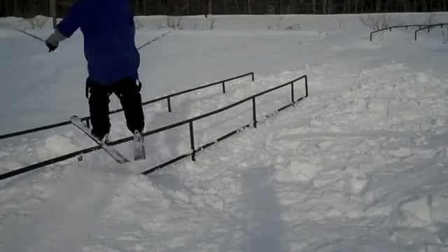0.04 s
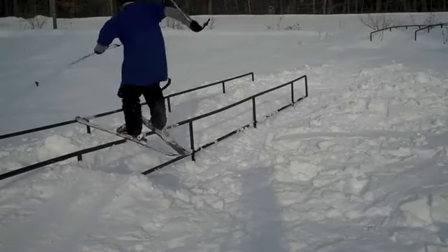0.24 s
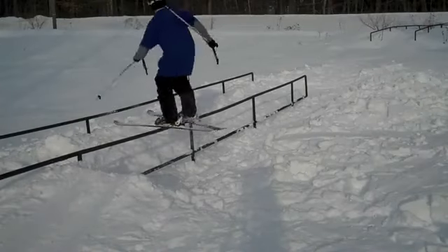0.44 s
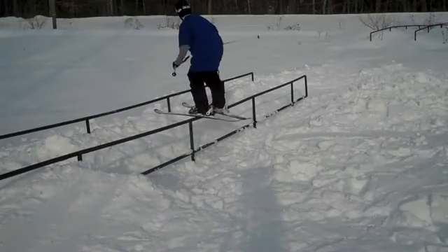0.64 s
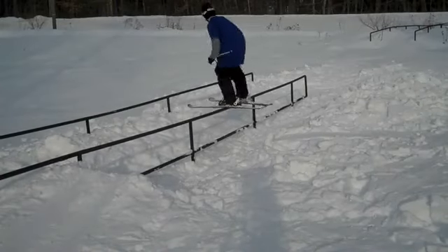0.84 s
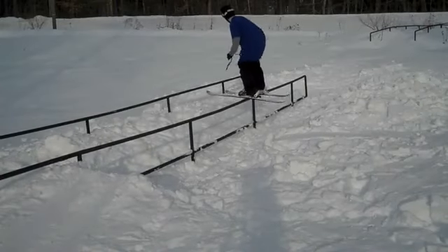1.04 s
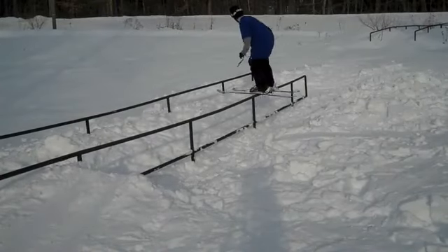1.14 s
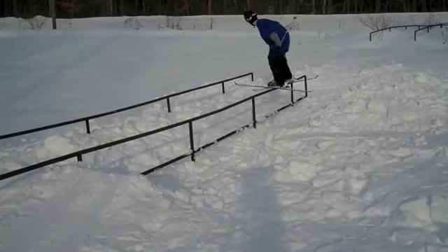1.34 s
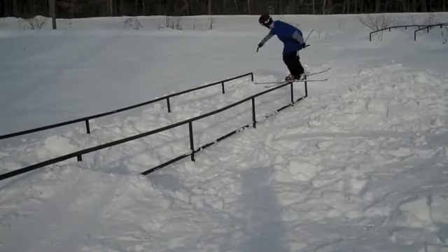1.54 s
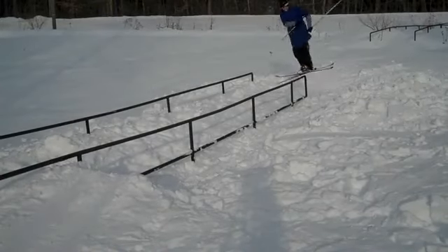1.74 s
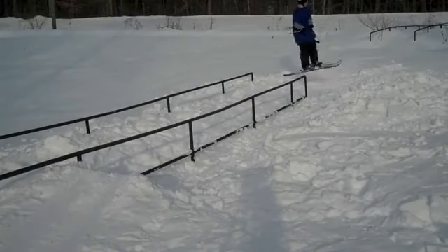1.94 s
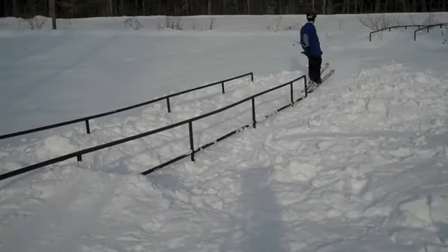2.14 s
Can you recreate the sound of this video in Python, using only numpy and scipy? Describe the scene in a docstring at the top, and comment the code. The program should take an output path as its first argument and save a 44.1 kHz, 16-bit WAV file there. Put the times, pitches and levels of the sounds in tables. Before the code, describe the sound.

Skis hit a metal rail with two sharp clacks, then grind and hiss along it with scattered knocks. They clatter off the end and crunch into snow. Outdoors there is no echo, and faint wind touches the microphone.

```python
"""Skis land on a steel handrail with two sharp clacks, slide along it sideways and clatter off the end.
Each impact is a short force pulse that excites ski, steel edge and binding; friction, thousands of
tiny catches a second, makes the edges grind and hiss. Both drive the tube's faintly ringing modes.
Snow sprays at the take-off ramp and crunches after the rail. Open snow gives almost no echo;
light wind touches the two small microphones."""
import sys
import numpy as np
from scipy import signal
from scipy.fft import rfft, irfft
from scipy.io import wavfile
from scipy.ndimage import uniform_filter1d

SR = 44100
rng = np.random.default_rng(int(sys.argv[2]) if len(sys.argv) > 2 else 0)


def inscribe(sig):
    """Save sig as 16-bit PCM at rate SR to the path in sys.argv[1].

    A 1-D sig is mono; a 2-D sig holds one channel per row.
    Samples are clipped to [-1, 1] before scaling.
    """
    pcm = np.round(np.clip(np.atleast_2d(sig).T, -1, 1) * 32767)
    wavfile.write(sys.argv[1], SR, pcm.astype(np.int16))


N = 97020
T = np.arange(N) / SR


def amp(db):
    """Amplitude ratio of a level in decibels."""
    return 10 ** (np.asarray(db) / 20)


def unit_rms(x):
    """Normalisation to mean power 1."""
    return x / np.sqrt(np.mean(x ** 2) + 1e-20)


def unit_energy(x):
    """Normalisation of each channel to energy 1."""
    return x / np.sqrt(np.sum(x ** 2, axis=-1, keepdims=True) + 1e-20)


def add(mix, start_s, sound):
    """Superposition: a sound joins the mix at its start time."""
    part = mix[..., max(round(start_s * SR), 0):][..., :sound.shape[-1]]
    part += sound[..., :part.shape[-1]]


def convolve(x, response):
    """Convolution with an impulse response, cut to the length of x."""
    return signal.fftconvolve(np.atleast_2d(x), np.atleast_2d(response), axes=1)[:, :x.shape[-1]]


def colour(x, points, size=4096):
    """Minimum-phase filter through points of (f/Hz, level/dB)."""
    hz, db = np.transpose(points)
    bin_hz = abs(np.fft.fftfreq(size, 1 / SR))
    log_gain = np.log(amp(np.interp(np.log(bin_hz + 1), np.log(hz + 1), db)))
    spectrum = np.exp(np.conj(signal.hilbert(log_gain)))
    return convolve(x, np.fft.ifft(spectrum).real[:size // 2])


def resonate(x, hz, width_hz):
    """Damped resonator whose natural frequency follows a curve."""
    turn = np.exp(2j * np.pi * np.cumsum(hz) / SR)
    pole = np.exp(-np.pi * width_hz / SR)
    return 2 * (turn * signal.lfilter([1 - pole], [1, -pole], x / turn)).real


def emphasise(x, hz, width_hz, db):
    """Resonance lifts one band out of a sound; the sum has energy 1."""
    return unit_energy(x + amp(db) * resonate(x, np.full(x.shape[-1], hz), width_hz))


def wobble(corner_hz):
    """Random fluctuation: low-pass noise of rms 1."""
    hz = np.fft.rfftfreq(N, 1 / SR)
    return unit_rms(irfft(rfft(rng.standard_normal(N)) / (1 + (hz / corner_hz) ** 2), N))


def grains(per_s, spread_db, apart):
    """Shot noise: random impulses common to both channels, plus each one's own, weighted by `apart`."""
    size = amp(spread_db * np.minimum(rng.exponential(1, (3, N)), 4))
    clicks = size * rng.choice([-1, 1], (3, N)) * (rng.random((3, N)) < per_s / SR)
    return clicks[0] + apart * clicks[1:]


def air_and_wind():
    """Turbulence at the microphones rumbles in puffs over the ambient noise of quiet winter air."""
    # spectra of air and wind: f/Hz, relative level/dB
    air_spectrum = [(30, 5.5), (150, 0.5), (400, 7), (800, 5.5), (1800, -6), (3500, -9), (7000, -16),
                    (14000, -6)]
    wind_spectrum = [(10, 6), (45, -1), (120, 0.5), (200, -8), (400, -44), (2000, -72)]
    # puffs of wind: t/s, level/dB, length/s
    puffs = [(0.095, -40, 0.022), (0.143, -51.5, 0.04), (0.354, -48, 0.036), (.5, -51.5, 0.039),
             (0.74, -49.5, 0.05), (1.332, -57, 0.044), (1.878, -57, 0.13)]
    noise = rng.standard_normal((6, N))
    air = unit_rms(colour(noise[0] + 0.73 * noise[1:3], air_spectrum))
    wind = unit_rms(colour(noise[3] + 4.1 * noise[4:], wind_spectrum))
    gusts = amp(-64) + sum(amp(db) * np.exp(-(2 * (T - s) / length) ** 2) for s, db, length in puffs)
    return amp(-53.5) * air + gusts * wind * amp([[-2], [2]])  # stronger on the right


def snow():
    """Granular noise: thrown snow sprays and pressed snow crunches, in exponentially decaying bursts."""
    # bursts of snow: t/s, spray level/dB, crunch level/dB, time constant/s
    bursts = [(0.011, -42, -69, 0.029), (1.85, -62, -55.5, 0.21), (2.039, -64, -56.5, 0.03)]
    # spectra of spray and crunch: f/Hz, relative level/dB
    spray_spectrum = [(1000, -7), (4000, -4.5), (6000, -1), (8000, 3.5), (10000, -1), (15000, 3)]
    crunch_spectrum = [(200, -14), (600, -1), (1500, 6.5), (2500, -0.5), (4000, -8), (7000, -14),
                       (12000, -12)]
    spray, crunch = (unit_rms(colour(grains(per_s=5000, spread_db=4.5, apart=.7), spectrum))
                     for spectrum in (spray_spectrum, crunch_spectrum))
    out = np.zeros((2, N))
    for s, spray_db, crunch_db, decay_s in bursts:
        envelope = (T > s) * np.exp(-abs(T - s) / decay_s)
        out += envelope * (amp(spray_db) * spray + amp(crunch_db) * crunch)
    return out


def rail_modes():
    """The steel tube's impulse response is a sum of damped normal modes."""
    # modes of the tube: f/Hz, relative level/dB, T60/s
    modes = [(210, -26, .45), (371, -23, .45), (690, -14, .35), (824, -14, .35), (1082, -12, .25),
             (1443, -7, .2), (1497, -1, .28), (1620, -1, .3), (1728, -7, .2), (1846, 1, .22),
             (2196, -4, .3), (2336, -8, .3), (2470, -7, .3), (2830, -9, .3)]
    t = T[:SR]
    ring = sum(amp(db) * unit_energy(amp(-60 * t / t60) * np.sin(2 * np.pi * (hz * t + rng.random())))
               for hz, db, t60 in modes)
    return unit_energy(ring)


def rail(force):
    """Forced vibration: the tube responds most on its last span and little at the end post."""
    # mobility of the tube under the moving skis: t/s, relative level/dB
    mobility = [(.4, -1.5), (1.3, 0.5), (1.52, 0.5), (1.68, 2.5), (1.8, -4)]
    gain = amp(np.interp(T, *np.transpose(mobility)))
    ring = unit_rms(convolve(force.mean(0), rail_modes()))
    return gain * ring * np.sqrt(np.mean(force ** 2))


def dense_ring(t60):
    """Overlapping modes of ski and binding ring as decaying noise, a little different in each channel."""
    t = T[:SR // 2]
    noise = rng.standard_normal((3, len(t)))
    return unit_energy((noise[0] + 0.19 * noise[1:]) * amp(-60 * t / t60))


def landings():
    """Sudden loading: the skier's weight gives a rough shudder and sets the tube's low modes humming."""
    # each ski's push on the tube: t/s, level/dB
    pushes = [(0.221, -50.5), (.338, -52)]
    # spectrum of a push: f/Hz, relative level/dB
    push_spectrum = [(100, -5), (210, -0.5), (370, 0), (700, -11), (1500, -30), (3000, -20)]
    out = np.zeros((2, N))
    for s, db in pushes:
        shudder = unit_energy(colour(dense_ring(t60=0.44), push_spectrum))
        hum = unit_energy(colour(rail_modes(), push_spectrum))
        add(out, s, amp(db) * shudder)
        add(out, s, amp(db + 2.5) * hum)
    return out * np.sqrt(SR / 10)  # levels refer to the energy spread over 0.1 s


def shimmer(x, patch_hz=170, patch_s=.05, depth_db=2.8, size=512):
    """Spectral modulation: narrow resonances come and go as the edges press on new spots of steel."""
    hop = size // 4
    spectra = signal.stft(x, nperseg=size, noverlap=size - hop)[2]
    patches = rng.standard_normal(spectra.shape[1:])
    patches = uniform_filter1d(patches, max(1, round(patch_hz * size / SR)), axis=0)
    patches = uniform_filter1d(patches, max(1, round(patch_s * SR / hop)), axis=1)
    gain = unit_rms(amp(depth_db * unit_rms(patches)))
    return signal.istft(spectra * gain, nperseg=size, noverlap=size - hop)[1][:, :N]


def slide():
    """Stick-slip friction: the chattering edges catch on the steel, grind, hiss and drive the tube."""
    # course of the slide: t/s, grinding level/dB, hiss level/dB
    course = [(.33, -65, -44), (.35, -48, -63), (.395, -38.5, -41), (.44, -42, -41), (0.577, -36, -36),
              (.61, -41, -41), (.678, -35, -38.5), (0.731, -45.5, -45.5), (0.783, -31.5, -35),
              (0.814, -43, -37), (0.871, -33, -35.5), (.92, -39.5, -41), (.99, -36.5, -43),
              (1.13, -30.5, -36.5), (1.21, -30.5, -36), (1.29, -28, -35.5), (1.405, -27, -38),
              (1.444, -23, -36), (1.478, -32, -43.5), (1.55, -26, -38), (1.6, -32, -42), (1.69, -33, -40.5),
              (1.753, -32, -36), (1.797, -38, -56), (1.817, -93, -49)]
    # spectra of grinding and edge hiss: f/Hz, relative level/dB
    grind_spectrum = [(60, -58), (250, -22), (480, -14.5), (750, -1.5), (1050, 2), (1700, 4.5), (2400, -2),
                      (3200, -14.5), (4500, -22), (10000, -76.5)]
    hiss_spectrum = [(600, -52), (1800, -3.5), (2900, 11), (4000, 2.5), (5400, 4.5), (7500, -1),
                     (10000, -6), (15000, -3.5)]
    # ski resonance, shifting with the contact point: t/s, f/Hz, level/dB re the broadband grinding
    ski_resonance = [(.35, 2080, 3), (.57, 1960, -5.5), (.88, 1290, 3), (1.05, 2050, -4.5), (1.2, 2300, 2),
                     (1.36, 1890, -10.5), (1.45, 1740, 0), (1.55, 1490, -3), (1.6, 1550, 4.5),
                     (1.625, 2190, -2), (1.65, 2740, -5.5), (1.75, 2460, -3.5), (1.8, 2300, -0.5)]
    s, grind_db, hiss_db = np.transpose(course)
    grind_gain, hiss_gain = (amp(np.interp(T, s, db, -np.inf, -np.inf)) for db in (grind_db, hiss_db))
    chatter = wobble(corner_hz=106)
    grind_chatter, hiss_chatter = amp(1.45 * chatter), amp(1.5 * chatter)
    catches, tone = (grains(per_s=5000, spread_db=2, apart=.14) * grind_chatter for _ in range(2))
    tone_s, tone_hz, tone_db = np.transpose(ski_resonance)
    for _ in range(2):  # two passes steepen the resonance's flanks
        tone = resonate(tone, np.interp(T, tone_s, tone_hz), width_hz=750)
    tone = unit_rms(tone) * amp(np.interp(T, tone_s, tone_db))
    grind = unit_rms(unit_rms(colour(catches, grind_spectrum)) + tone)
    fine_catches = grains(per_s=14000, spread_db=3.0, apart=.95) * hiss_chatter
    hiss = unit_rms(colour(fine_catches, hiss_spectrum))
    ring = rail(unit_rms(catches) * grind_gain)
    return grind_gain * grind + hiss_gain * hiss + amp(-9) * ring


def noise_pulse(decay_s):
    """A brief pulse is broadband: a rough burst, whitened to an even spectrum."""
    t = T[:SR // 3]
    burst = rng.standard_normal(len(t)) * np.exp(-t / decay_s) * (1 - np.exp(-2 * t / decay_s))
    power = uniform_filter1d(abs(rfft(burst)) ** 2, size=260)
    whitening = np.transpose([np.fft.rfftfreq(len(t), 1 / SR), -10 * np.log10(power)])
    return unit_energy(colour(burst, whitening)[0])


def clacks():
    """Impact excitation: ski and edge ring at pitches set by the spot struck; binding and tube follow.
    The burst at 0.2105 s is a faint, short swell of noise just before the first clack."""
    # short bursts: t/s, thud level/dB, knock level/dB, crack level/dB, time constant/s,
    # rattle level offset/dB, ping f/Hz, crack f/Hz
    bursts = [(0.0708, -73, -53, -54.5, 0.0026, -18, 2800, 5000),
              (0.2105, -41, -32.5, -34, 0.0034, -8, 1890, 6000),
              (0.2180, -24, -17, -15, 0.00065, -1.5, 2300, 5350),
              (.2203, -29.5, -29, -41, 0.0012, 6.5, 2770, 6200),
              (0.2411, -31.5, -22, -23, 0.00045, -5, 1590, 7700),
              (0.327, -64, -29.5, -30.5, 0.0029, -9, 2080, 6350),
              (0.3363, -23.5, -16, -16.5, 0.0005, -2, 2245, 7250),
              (0.3394, -28.5, -23, -24.5, 0.0013, 1.5, 1750, 5950),
              (.3755, -43, -32, -40.5, 0.0012, -16, 1986, 7400),
              (.570, -40, -30, -46, 0.0064, 11.5, 1840, 5700),
              (.764, -32, -33, -29, 0.0022, 5.5, 2800, 6200),
              (0.784, -22.5, -22.5, -22.5, 0.0013, 0.5, 1870, 6260),
              (0.7884, -24, -25, -28.5, 0.0029, -10, 2740, 6740),
              (.8675, -44, -27, -27, 0.0041, 1, 3000, 6060),
              (0.8837, -30, -38, -27.5, 0.0015, 4.5, 1470, 5700),
              (1.1115, -31.5, -24.5, -36, 0.00084, 1, 1660, 6100),
              (1.3818, -52, -23.5, -33, 0.0024, 7, 1850, 4500),
              (1.4438, -29, -22, -43, 0.0018, -10, 1730, 7000),
              (1.4607, -30, -17.5, -37, 0.0013, 0, 1520, 7000),
              (1.5445, -42, -31, -32.5, 0.0036, -6, 1640, 6800),
              (1.558, -40, -24, -52, 0.0015, -6, 1630, 7050),
              (1.753, -33.5, -30.5, -37, 0.001, 1, 1580, 7400),
              (1.8176, -35, -28, -30.5, 0.0009, -10.5, 2290, 7700),
              (1.828, -28.5, -32.5, -46, 0.0036, -20, 1760, 7000),
              (1.9368, -36.5, -36.5, -35.5, 0.0021, 1, 2220, 6550),
              (1.9412, -33.5, -26, -27.5, 0.00079, -8, 2160, 4800),
              (1.9626, -44, -40, -37.5, 0.0025, -8, 1670, 4500),
              (2.154, -61, -49.5, -49.5, 0.00064, -21, 1870, 4800)]
    # spectra of a burst's low, middle and high parts: f/Hz, relative level/dB
    thud_spectrum = [(60, -23), (380, -13), (560, -4.5), (760, 1.5), (1000, 5), (1700, 0.5), (4000, -45.5)]
    knock_spectrum = [(300, -52.5), (900, -15), (1500, 3.5), (2200, -3.5), (3000, -5.5), (4200, -21),
                      (9000, -42.5)]
    crack_spectrum = [(1000, -55), (2800, -10), (3900, 2), (4800, 1), (7500, -3), (10000, -3),
                      (15000, -0.5)]
    dulling_db_per_s = 8.5  # the top treble fades as the skier moves away
    out = np.zeros((2, N))
    for s, thud_db, knock_db, crack_db, decay_s, loose_db, ping_hz, crack_hz in bursts:
        pulses = np.array([noise_pulse(decay_s) for _ in range(3)])  # common, left, right
        thud = unit_energy(colour(pulses[0], thud_spectrum))
        knock = emphasise(colour(pulses[0], knock_spectrum), ping_hz, width_hz=217, db=9)
        crack = colour(pulses[0] + 0.45 * pulses[1:], crack_spectrum)
        crack = emphasise(crack, crack_hz, width_hz=680, db=3.5)
        crack = colour(crack, [(7000, 0.0039), (11000, -dulling_db_per_s * s)])
        burst = amp(thud_db) * thud + amp(knock_db) * knock + amp(crack_db) * crack
        burst *= np.sqrt(.003 * SR)  # levels refer to the energy spread over 3 ms
        ring = amp(-9.5) * dense_ring(t60=.05)
        rattle = amp(-7.5 + loose_db) * dense_ring(t60=0.37)
        add(out, s, burst + convolve(burst, ring + rattle))
    return out + amp(-11) * rail(out)


def scene():
    """Superposition in a free field: skis, rail, snow and air add without echo."""
    return shimmer(slide()) + clacks() + landings() + snow() + air_and_wind()


def record(dry):
    """Transduction: each microphone has its own treble resonance; peaks clip and the band is limited."""
    # frequency responses of the microphones: f/Hz, level/dB
    left_response = [(1000, -1.38), (4000, 2), (5200, 7.5), (6300, 7), (7400, 19), (8200, 10.5), (9500, 3),
                     (12000, -4)]
    right_response = [(1000, -1), (4000, 2.5), (5000, 5.5), (5900, 14.5), (6600, 13.5), (7500, 6),
                      (9000, -4), (10500, -9.5), (14000, -10)]
    left_lag_s, overload, cutoff_hz = .00002, .88, 14350
    left, right = colour(dry[0], left_response)[0], colour(dry[1], right_response)[0]
    delay = np.exp(-2j * np.pi * np.fft.rfftfreq(N, 1 / SR) * left_lag_s)
    left = irfft(rfft(left) * delay, N)
    clipped = np.clip([left, right], -overload, overload)
    low_pass = signal.firwin(301, cutoff_hz, window=("kaiser", 8), fs=SR)
    return signal.oaconvolve(clipped, low_pass[None], "same")


dry = scene()
out = record(dry)
inscribe(out)
```